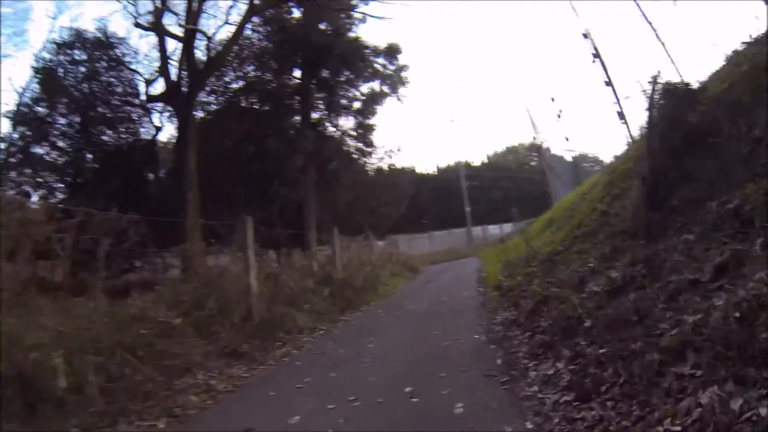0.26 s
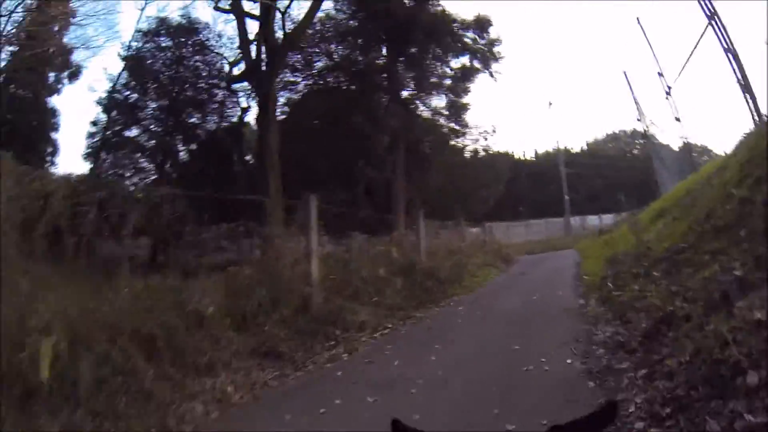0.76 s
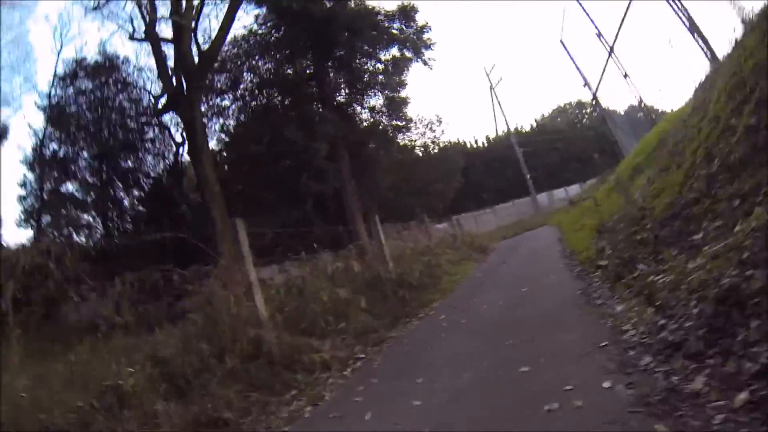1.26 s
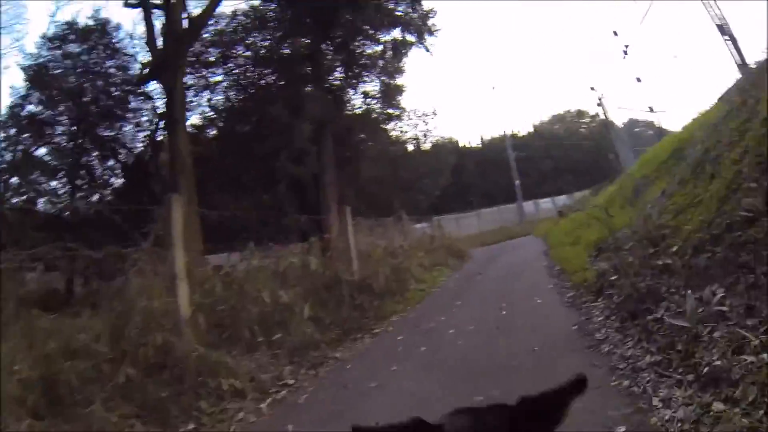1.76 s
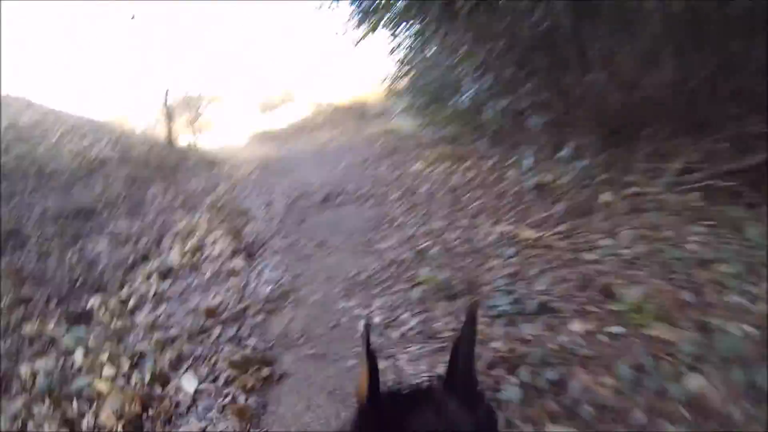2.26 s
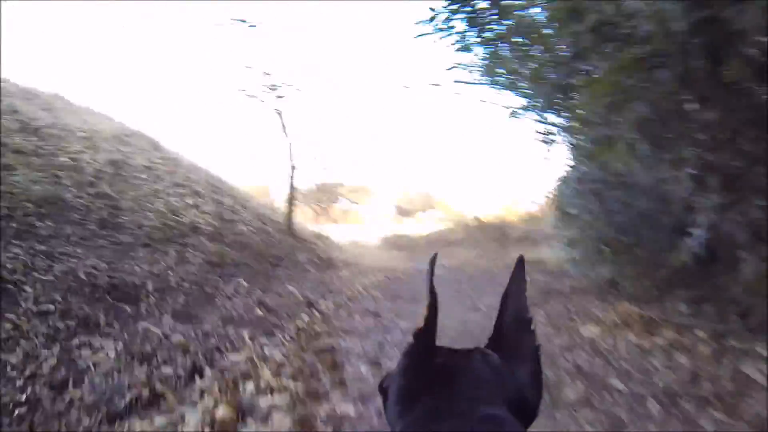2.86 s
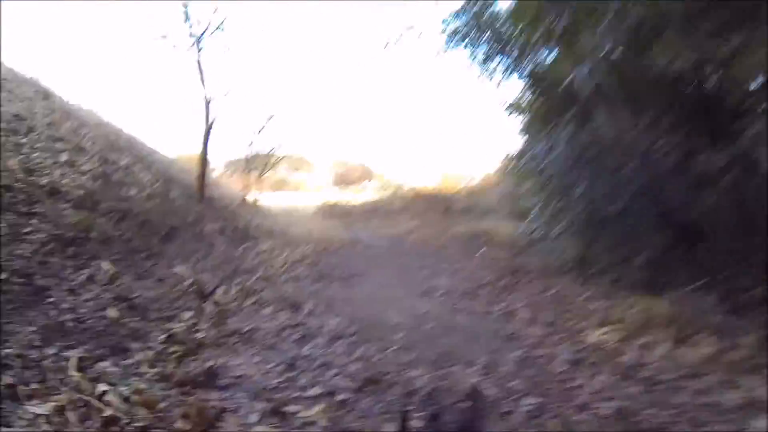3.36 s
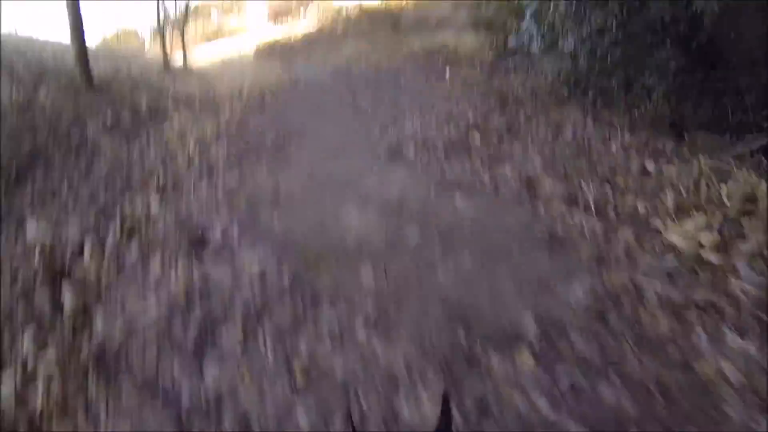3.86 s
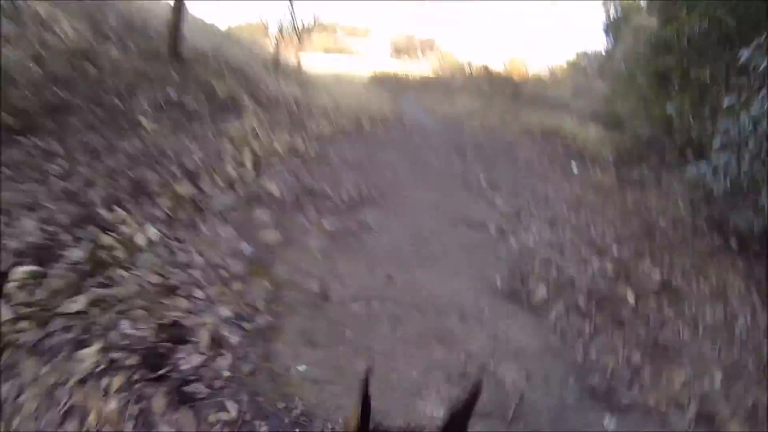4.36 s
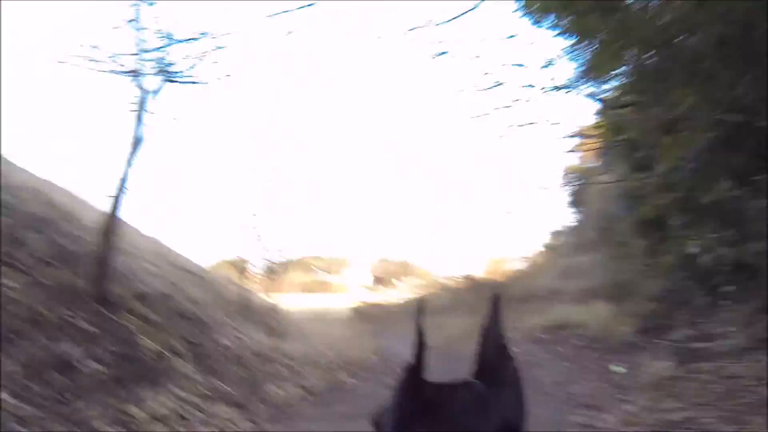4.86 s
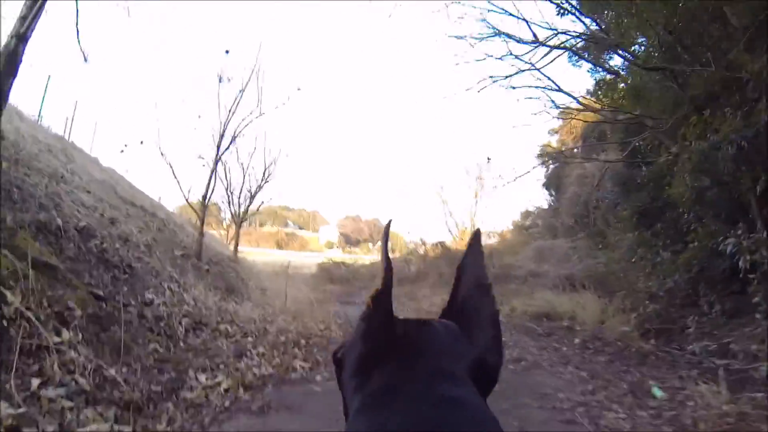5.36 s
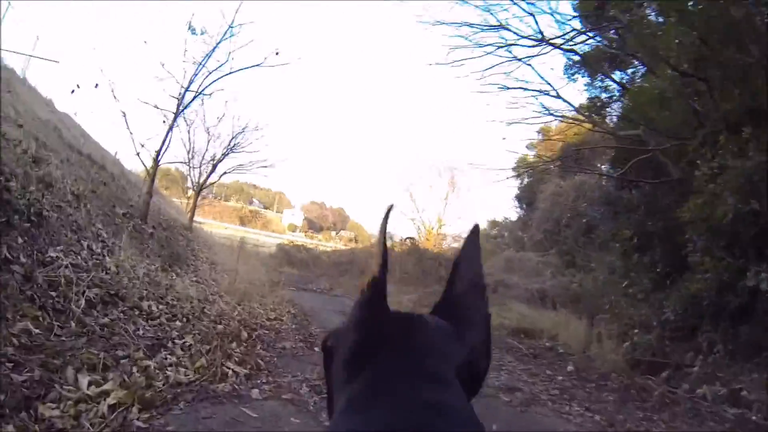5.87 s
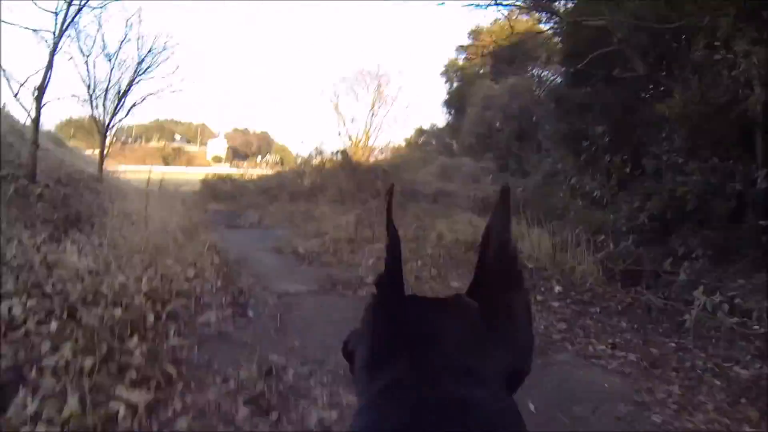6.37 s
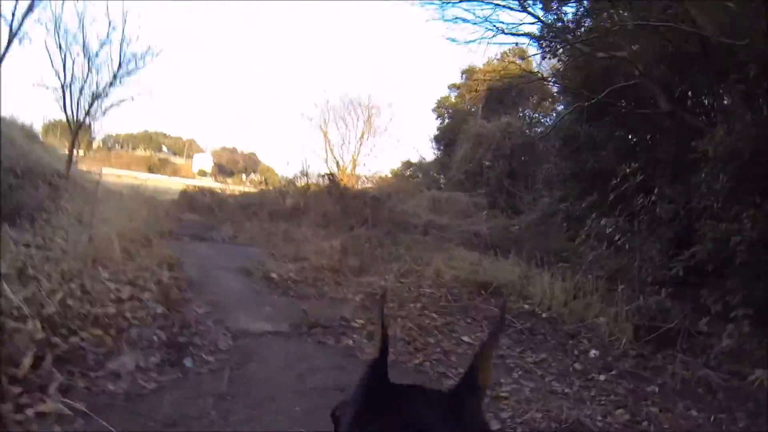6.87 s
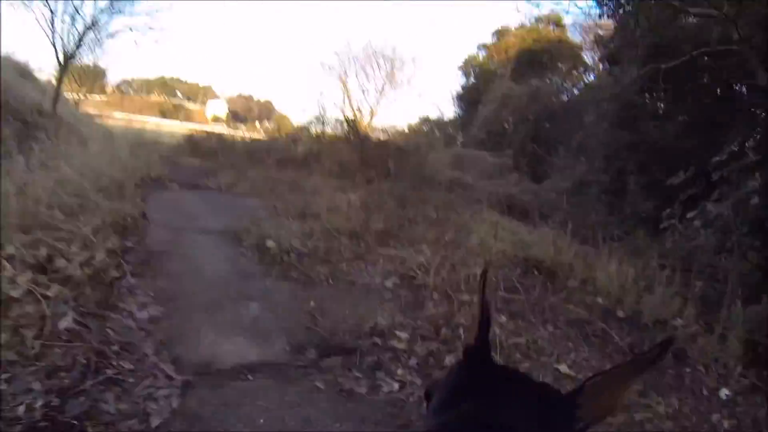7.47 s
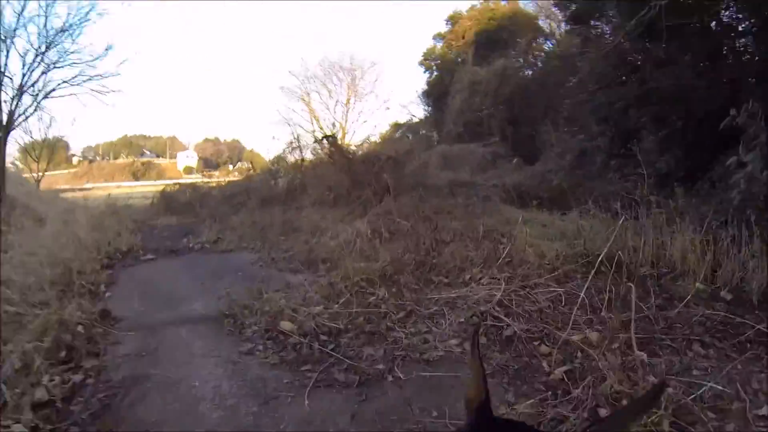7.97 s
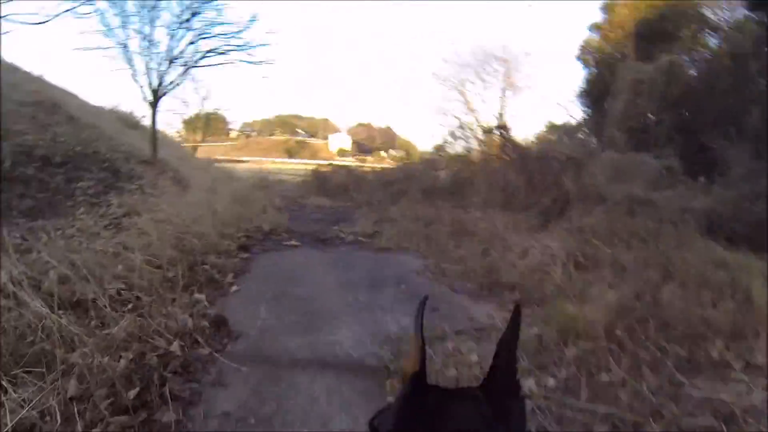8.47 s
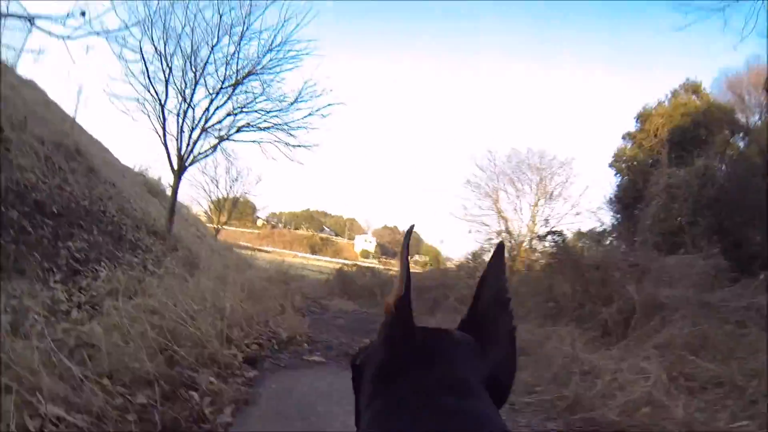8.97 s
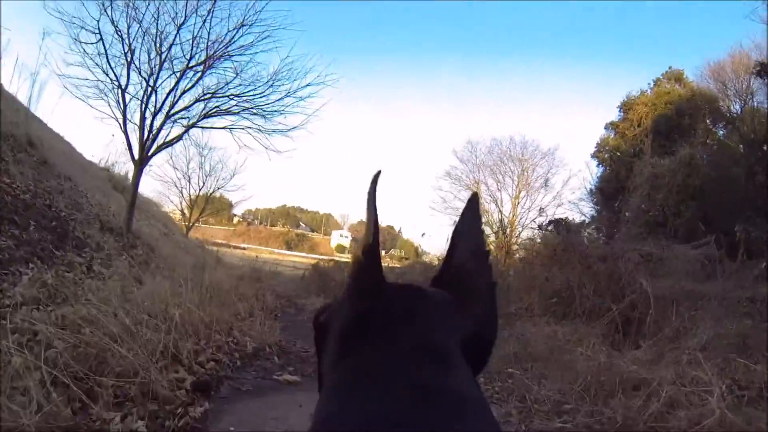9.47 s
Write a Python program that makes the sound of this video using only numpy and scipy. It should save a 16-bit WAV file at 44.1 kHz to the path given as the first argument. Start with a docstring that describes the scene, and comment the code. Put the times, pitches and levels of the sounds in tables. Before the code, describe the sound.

A very close, dry, slightly muffled outdoor sound: low thuds and rumble of a shaken harness, with crisp plastic clicks at first. Small metal tags on a dog's collar soon clink together in uneven clusters, ringing high and briefly, bouncing and jiggling between harder hits. Dry leaves crackle softly beneath the paws, and faint airy noise wavers behind.

```python
"""Outdoors: a dog trots along with a microphone strapped to its back, first on a paved path; at 1.85 s the
scene changes to a leafy one. Jolts throw two metal tags on its collar together: decaying sine modes and noise
ticks clack, ring, bounce and jiggle on, and a split ring clicks. The plastic mount snaps as damped modes, with
dull knocks and scuffs as noise bursts; the harness thumps and rumbles as low noise, and paws scuff leaves made
of random grains."""
import sys
import numpy as np
from scipy import signal
from scipy.fft import rfft, irfft, next_fast_len
from scipy.io import wavfile
from scipy.ndimage import uniform_filter1d

SR = 44100
rng = np.random.default_rng(int(sys.argv[2]) if len(sys.argv) > 2 else 0)


def put_to_file(sound):
    """Save the sound as 16-bit audio at rate SR, in the file named by the first command-line argument."""
    columns = np.atleast_2d(sound).T  # one column per channel
    safe = np.clip(columns, -1, 1)
    whole_steps = np.round(safe * 32767)
    wavfile.write(sys.argv[1], SR, whole_steps.astype(np.int16))


N = 429093
TIME = np.arange(N) / SR

# hard contacts of the tags: [t/s, clack level/dB, fundamental level/dB,
# large tag's overtone level/dB, small tag's overtone level/dB]
TAG_CONTACTS = [(1.8544, -33, -20.5, -33, -28), (1.9663, -42, -26.5, -27, -23.5),
                (1.986, -17, -22, -36, -27), (2.0034, -26, -22.5, -33, -27.5),
                (2.0338, -20, -21.5, -28.5, -47), (2.1523, -14.5, -24, -39, -21),
                (2.2028, -28, -21.5, -30, -52), (2.2898, -33, -34, -40, -31), (2.318, -20, -52, -36, -36),
                (2.528, -7.5, -33, -48, -25), (2.8297, -18.5, -23, -40, -30.5),
                (2.8889, -23, -21, -24.5, -51), (2.9984, -42, -8.5, -25, -56),
                (3.0225, -21.5, -14.5, -34, -30), (3.0577, -28, -32, -31, -55), (3.139, -20, -21, -29, -28),
                (3.1807, -20.5, -36, -42, -28), (3.356, -24, -25, -35, -56), (3.6455, -10, -19, -22, -49),
                (3.7835, -13.5, -12.5, -31, -33), (3.8125, -25.5, -15, -29, -41.5),
                (3.8698, -26, -21.5, -32, -49), (4.0547, -26.5, -26.5, -36.5, -54),
                (4.3137, -15, -39, -32, -28.5), (4.3737, -21, -33, -30, -54),
                (4.4422, -20.5, -18.5, -28, -34), (4.5095, -23, -16.5, -27, -51),
                (4.6177, -17, -23.5, -34, -42), (4.713, -21, -16.5, -26.5, -44),
                (4.8262, -9, -19, -22.5, -24.5), (4.897, -20, -19, -30, -38),
                (4.9323, -36.5, -13.5, -16.5, -18), (4.9596, -18, -10, -24, -16.5),
                (5.085, -30, -13, -22, -37), (5.131, -44, -25, -19, -32), (5.1564, -19.5, -26, -27, -36),
                (5.1865, -37, -15, -50, -47), (5.3529, -26, -34, -30.5, -35),
                (5.3861, -12.5, -20, -25, -44), (5.4044, -38, -7.5, -31, -19),
                (5.4259, -42, -14.5, -23, -25.5), (5.5284, -19.5, -21.5, -21, -40),
                (5.5755, -31, -14, -21, -33), (5.6508, -16.5, -27.5, -55, -37),
                (5.726, -8.5, -17.5, -23, -18.5), (5.8545, -17.5, -42, -42, -22),
                (5.9585, -16.5, -38, -54, -28), (6.0969, -23.5, -30, -48, -31.5),
                (6.1922, -17, -48, -40, -26), (6.3124, -30, -26, -30, -48), (6.3894, -44, -31, -34.5, -32),
                (6.5654, -16, -19, -18.5, -41), (6.6332, -21, -17, -24.5, -48),
                (6.6942, -21.5, -23.5, -38, -22), (6.862, -44.5, -32, -32, -34.5),
                (6.897, -39, -18.5, -35.5, -26), (6.93, -16.5, -20.5, -34, -33),
                (7.0871, -14.5, -28, -30.5, -35), (7.0975, -21.5, -41, -34.5, -41),
                (7.2986, -36, -24, -34.5, -55), (7.4006, -32, -46, -42, -49),
                (7.4372, -19.5, -31, -34, -26.5), (7.4537, -12.5, -42, -43, -34),
                (7.7036, -23.5, -39, -46, -60), (7.7515, -19.5, -34, -37.5, -39.5),
                (7.87, -47, -39, -31, -42), (8.015, -19.5, -22.5, -35.5, -45.5),
                (8.144, -18.5, -40, -34, -45), (8.6488, -25, -25.5, -32.5, -32),
                (8.8138, -18, -25, -35.5, -36), (8.858, -12.5, -41, -50, -33),
                (8.8759, -15.5, -24, -23.5, -38), (8.921, -22.5, -22.5, -36.5, -49),
                (9.007, -19, -27, -23, -38), (9.0181, -10.5, -8.5, -19, -17),
                (9.0405, -13.5, -30, -22, -23), (9.0798, -25, -39, -28, -46),
                (9.158, -25.5, -34, -46, -23.5), (9.2137, -22.5, -38, -42, -30),
                (9.548, -29, -30.5, -27, -22.5), (9.672, -16.5, -25, -50, -33.5)]
# lowest bending mode of each tag: [f/Hz, level/dB, t60/s]
FUNDAMENTAL_MODES = [(1404, -20.5, 0.74), (1487, 0, 0.17)]
# overtones of the large tag: [f/Hz, level/dB, t60/s]
LARGE_TAG_MODES = [(2788, -11.5, 0.12), (4873, -8.5, 0.14), (7534, -5.5, 0.11), (10255, -14, 0.086),
                   (11970, -26.5, 0.16)]
# overtones of the small tag: [f/Hz, level/dB, t60/s]
SMALL_TAG_MODES = [(3043, -14, 0.17), (5544, -7, 0.09), (8180, -5.5, 0.074), (11760, -21.5, 0.049),
                   (13812, -22, 0.12)]
# short-lived modes of the tags pressed together: [f/Hz, level/dB, t60/s]
CLACK_MODES = [(1524, -5.5, 0.11), (1680, -5, 0.082), (1695, -14, 0.052), (1790, -71, 0.021)]
# spectrum of metal edges hitting: [f/Hz, level/dB]
TICK_SPECTRUM = [(500, -17), (1000, -3.5), (2000, -1), (3200, 1.5), (4500, -1), (6500, 2.5), (8000, -4.5),
                 (9500, -7), (12000, -27), (16000, -32)]


def from_db(db):
    """Decibels to gain."""
    return 10 ** (np.asarray(db) / 20)


def rms_one(x):
    """Scale to unit rms."""
    return x / np.sqrt(np.mean(x ** 2) + 1e-20)


def gain_curve(rows):
    """Rows (t/s, level/dB) as a gain for every sample."""
    return from_db(np.interp(TIME, *np.transpose(rows)))


def dying(t, t60):
    """Exponential decay, 60 dB down after t60 seconds."""
    return np.exp(-np.log(1000) * t / max(t60, 1e-4))


def coloured(x, spectrum):
    """Shape x by a spectrum of (f/Hz, level/dB) points; rms 1."""
    hz, db = np.transpose(spectrum)
    size = next_fast_len(N)
    bins_hz = np.maximum(np.arange(size // 2 + 1) * SR / size, 1)
    low_cut = 1 / (1 + (hz[0] / 2 / bins_hz) ** 4)  # rolls off an octave below the first point
    gain = from_db(np.interp(np.log(bins_hz), np.log(hz), db))
    return rms_one(irfft(rfft(x, size) * low_cut * gain, size)[:N])


def noise(spectrum):
    """Gaussian noise of the given colour."""
    return coloured(rng.standard_normal(N), spectrum)


def add(out, s, sound):
    """Mix a sound into out, starting at s seconds."""
    i = max(round(s * SR), 0)
    out[i:i + len(sound)] += sound[:max(N - i, 0)]


def air(level_db, waver_db, per_s):
    """A faint airy noise that swells and sinks at random."""
    # spectrum of the air: [f/Hz, level/dB per Hz]
    air_spectrum = [(100, 2.5), (300, -4), (900, -6), (2000, -26), (2900, -9.5), (4300, -28), (5800, -15.5),
                    (9000, -25), (15000, -33)]
    swells = np.interp(TIME * per_s, np.arange(200), rng.uniform(-1, 1, 200))
    return from_db(level_db + waver_db * swells) * noise(air_spectrum)


def leaves(per_s, grain_db, level_db):
    """Dry leaves and grit crackle in a dense stream of uneven grains, swelling at each scuff."""
    # paws drag through the leaves: [t of peak/s, relative level/dB, t60 of the settling/s]
    scuffs = [(2.01, -57, 1.3), (2.11, -54, .6), (2.24, -54, 0.65), (2.82, -46, 0.48), (3.29, -55, .4),
              (3.67, -54, 3.4), (4.31, -55, 0.64), (4.86, -55, 1.25), (5.36, -45, 0.79), (5.74, -51, 1.2),
              (6.21, -64, 1.1), (6.85, -56, 0.67), (7.07, -58.5, .4), (7.95, -62, 1.3), (8.85, -67, 2.2),
              (9.02, -46.5, 0.64)]
    # spectrum of the crackle: [f/Hz, level/dB per Hz]
    leaf_spectrum = [(300, -1.5), (900, 2.5), (1600, 18.5), (2400, 7.5), (4500, 5.5), (6200, 6.5),
                     (9000, -1.5), (12000, -5), (16000, -18)]
    leafy_from_s, rise_s = 1.85, 0.066
    paved_rel_db, leafy_rel_db = -71.5, -67.5  # steady crunch, before level_db

    pressure = from_db(np.where(TIME < leafy_from_s, paved_rel_db, leafy_rel_db))
    t = TIME[:2 * SR]
    for s, db, t60 in scuffs:
        rise = np.minimum(t / rise_s, 1)
        settling = dying(np.maximum(t - rise_s, 0), t60)
        add(pressure, s - rise_s, from_db(db) * rise * settling)

    sizes = from_db(grain_db * np.minimum(rng.exponential(1, N), 5)) * rng.standard_normal(N)
    grains = sizes * (rng.random(N) < per_s / SR)
    return from_db(level_db) * pressure * coloured(grains, leaf_spectrum)


def shudder(spectrum, even_s):
    """Low shaking, its strength evened out over even_s."""
    x = noise(spectrum)
    power = uniform_filter1d(x ** 2, max(int(even_s * SR), 2))
    return x / np.sqrt(power + 0.0067)


def harness(thump_db, sway_db, swell_s, settle_s):
    """Every jolt makes the housing shudder for a moment, over a slower rumble."""
    # heavy jolts: [t/s, relative level/dB]
    thumps = [(0.034, -35.5), (0.711, -39.5), (0.973, -45), (1.38, -51), (2.206, -37.5), (2.535, -30),
              (3.091, -33), (3.232, -36.5), (3.31, -35), (3.388, -28), (3.558, -35.5), (3.817, -42.5),
              (4.475, -33), (4.977, -29), (5.072, -37), (5.233, -23.5), (6.283, -35.5), (6.442, -34.5),
              (6.916, -32), (7.139, -31), (7.217, -41), (7.593, -25.5), (7.754, -30.5), (7.847, -37.5),
              (8.138, -31), (8.3, -29), (8.892, -38), (9.612, -37)]
    # slow rumble: [t/s, relative level/dB]
    sway = [(0.0, -46), (0.02, -39.5), (0.6, -49), (3.06, -41), (3.09, -33.5), (4.69, -48), (4.99, -37.5),
            (7.45, -44), (7.59, -29), (7.64, -38.5), (9.57, -45), (9.62, -35.5), (9.73, -53)]
    # spectra of jolt and rumble: [f/Hz, level/dB per Hz]
    thump_spectrum = [(45, 5.5), (85, 7.5), (150, 3.5), (210, -6), (330, -16.5), (800, -35.5), (5000, -77)]
    sway_spectrum = [(20, 0), (50, 2), (75, -4.5), (130, -16), (300, -48.5), (3000, -93)]
    steps_per_s, step_rel_db = 7, -48.5  # the trot itself gives soft jolts

    steps = []
    for k in range(int(steps_per_s * N / SR)):
        steps.append(((k + rng.random()) / steps_per_s, step_rel_db))

    force = np.zeros(N)
    for s, db in [*thumps, *steps]:
        near = slice(max(round((s - .2) * SR), 0), round((s + .2) * SR))
        t = TIME[near] - s
        width_s = np.where(t < 0, swell_s, settle_s)
        force[near] += from_db(db + thump_db) * np.exp(-(t / width_s) ** 2)
    jolts = force * shudder(thump_spectrum, even_s=0.0285)
    rumble = from_db(sway_db) * gain_curve(sway) * shudder(sway_spectrum, even_s=0.84)
    return jolts + rumble


def knocks_and_scuffs(t60, level_db):
    """Short noise bursts: knocks, scuffs and a tag contact, each dying away exponentially."""
    # knocks and scuffs: [t/s, relative level/dB]
    bursts = [(2.272, -25.5), (2.529, -21), (2.787, -24), (2.803, -19), (3.293, -27.5), (3.335, -26),
              (3.645, -22), (5.514, -22.5), (5.842, -27.5), (5.909, -22), (6.183, -26), (6.567, -24.5),
              (7.823, -32), (8.819, -25), (8.857, -19.5), (9.288, -28.5), (9.312, -31.5)]
    # spectrum of a burst: [f/Hz, level/dB]
    burst_spectrum = [(150, 0.5), (500, 1.5), (1200, 4.5), (2500, 5), (7000, -10), (15000, -47)]
    force, t = np.zeros(N), TIME[:SR // 10]
    for s, db in bursts:
        add(force, s, from_db(db + level_db) * dying(t, t60))
    return force * noise(burst_spectrum)


def mount_snaps(rebound_s, rebound_db):
    """The plastic joint slips: damped modes give a sharp snap and a faint rebound."""
    # slips: [t/s, level/dB]
    slips = [(0.7353, -12.5), (1.2376, -12.5), (1.4530, -7.5), (1.689, -38.5), (2.625, -28.5),
             (3.4130, -18), (3.7380, -24.5), (5.3256, -17), (6.022, -23.5), (6.4853, -18.5),
             (6.9583, -20.5), (8.2690, -28), (8.375, -36.5)]
    # modes of the mount: [f/Hz, level/dB, t60/s]
    mount_modes = [(2530, -14.5, 0.0071), (3160, 1.5, 0.0055), (4840, 2, 0.0019), (6660, -1, 0.0044)]
    out, t = np.zeros(N), TIME[:SR // 20]
    shape = np.zeros(len(t))
    for k, (hz, db, t60) in enumerate(mount_modes):
        polarity = (-1) ** k
        shape += polarity * from_db(db) * dying(t, t60) * np.sin(2 * np.pi * hz * t)

    for s, db in slips:
        snap = from_db(db) * shape
        add(out, s, snap)
        add(out, s + rebound_s, from_db(rebound_db) * snap)
    return signal.sosfilt(signal.butter(4, [2200, 7600], "band", fs=SR, output="sos"), out)


def ring_clicks(t60, level_db):
    """The tags' split ring hits the collar's fitting, steel on steel: a bright click with no tone."""
    # clicks: [t/s, relative level/dB]
    clicks = [(2.8897, -22.5), (3.6463, -15), (4.3148, -21.5), (4.9125, -20.5), (5.2248, -25.5),
              (5.5279, -20), (5.5538, -22), (6.5649, -16.5), (7.401, -25), (7.602, -27.5), (7.957, -30.5),
              (9.0176, -15.5)]
    force, t = np.zeros(N), TIME[:SR // 20]
    for s, db in clicks:
        add(force, s, from_db(db + level_db) * dying(t, t60))
    return force * noise(TICK_SPECTRUM)


def radiated(x):
    """A small plate gives off almost nothing below its lowest mode."""
    return signal.sosfilt(signal.cheby1(6, .5, 1310, "high", fs=SR, output="sos"), x)


def ring(t, modes, spread_db, detune):
    """One blow on a set of modes; strength and pitch vary with the point of contact."""
    out = np.zeros(len(t))
    for hz, db, t60 in modes:
        strength, pitch = 2 * rng.random(2) - 1
        tone = np.sin(2 * np.pi * hz * (1 + detune * pitch) * t)
        out += from_db(db + spread_db * strength) * dying(t, t60) * tone
    return out


def jiggles(uneven_db):
    """Each run is a string of touches, uneven in time and strength: (t/s, clack/dB, ring/dB)."""
    # runs of light touches: [start/s, length/s, clack level/dB, ring level/dB]
    rattles = [(0.011, 0.074, -32, -54.5), (0.137, 0.071, -32, -56), (.387, .013, -37.5, -53),
               (1.27, .12, -47.5, -79.5), (1.68, .05, -39, -81), (2.29, .1, -35.5, -56),
               (2.451, 0.32, -37, -45.5), (3.49, 0.23, -32, -45), (3.83, 0.18, -33, -41),
               (4.18, 0.11, -35.5, -43), (4.36, 0.46, -31.5, -36.5), (4.87, .37, -25.5, -33.5),
               (5.5, .11, -28.5, -34.5), (5.74, 0.15, -30.5, -29.5), (6.222, 0.22, -36.5, -37.5),
               (6.46, .1, -30.5, -43.5), (6.57, 0.22, -31.5, -33), (6.89, .11, -30, -34.5),
               (7.22, 0.21, -37, -49), (7.87, 0.21, -34, -38.5), (8.325, 0.05, -35, -60),
               (8.438, 0.39, -43, -64), (9.41, 0.31, -41.5, -40)]
    ref_db, ref_per_s, rate_follows = -33, 80.0, .6  # touch rate at ref_db; slower when softer

    touches = []
    for s, length_s, clack_db, ring_db in rattles:
        rate_per_s = ref_per_s * from_db(rate_follows * (clack_db - ref_db))
        count = max(round(length_s * rate_per_s), 1)
        for k, (late, strength) in enumerate(rng.random((64, 2))[:count]):
            db = uneven_db * (2 * strength - 1)
            touch_s = s + length_s * (k + late) / (count + 1)
            touches.append((touch_s, clack_db + db, ring_db + db))
    return touches


def bounces(rebound_s, loss_db, ring_db, count):
    """Tags fall back on each other, each clack softer, the ring alike: (t/s, clack/dB, ring/dB)."""
    touches = []
    for s, clack, low, large, small in TAG_CONTACTS:
        for k in range(1, count + 1):
            s += rebound_s * k * (.5 + rng.random())
            touches.append((s, clack - loss_db * k, max(large, small) + ring_db))
    return touches


def light_touches(touches, clack_db, ring_db, overtone_db, tick_db, soft_s, pressed_t60, count):
    """A free tag ticks and rings, one on the fur clacks softly; each touch mixes both at one of count spots."""
    out, t = np.zeros(N), TIME[:SR // 7]
    cushion = from_db(clack_db) * (1 - dying(t, soft_s)) * dying(t, pressed_t60)
    spots = []
    for grit in noise(TICK_SPECTRUM)[:count * len(t)].reshape(count, -1):
        free = ring(t, FUNDAMENTAL_MODES, spread_db=5.5, detune=.004)
        free += from_db(tick_db) * dying(t, 0.0055) * grit
        overtones = [*LARGE_TAG_MODES, *SMALL_TAG_MODES]
        free += from_db(overtone_db) * ring(t, overtones, spread_db=6.5, detune=0.0043)
        pressed = cushion * ring(t, CLACK_MODES, spread_db=5.0, detune=0.0624)
        spots.append((pressed, from_db(ring_db) * free))

    for (s, clack, ringing), spot in zip(touches, rng.integers(count, size=len(touches))):
        pressed, free = spots[spot]
        add(out, s, from_db(clack) * pressed + from_db(ringing) * free)
    return radiated(out)


def tags(caught_t60, tick_t60, chatter_t60, tick_db, chatter_db):
    """Each contact ticks, clacks and sets both tags' modes ringing until the next one catches them."""
    tones, ticks, grit = np.zeros(N), np.zeros(N), noise(TICK_SPECTRUM)
    gaps_s = np.diff([row[0] for row in TAG_CONTACTS] + [N / SR])
    for (s, clack, low, large, small), gap_s in zip(TAG_CONTACTS, gaps_s):
        t = TIME[:int((np.clip(gap_s, 0, .35) + .08) * SR)]
        tone = from_db(low) * ring(t, FUNDAMENTAL_MODES, spread_db=5.0, detune=0.0045)
        tone += from_db(large) * ring(t, LARGE_TAG_MODES, spread_db=11.0, detune=0.0011)
        tone += from_db(small) * ring(t, SMALL_TAG_MODES, spread_db=9.5, detune=0.0043)
        tone *= dying(np.maximum(t - gap_s, 0), caught_t60)
        pressed = from_db(clack) * ring(t, CLACK_MODES, spread_db=1.0, detune=0.0512)
        add(tones, s, tone + pressed)

        # edges hit, then skid briefly, in step with the force of the blow
        force = np.linalg.norm(from_db([clack, low, large, small]))
        skid = from_db(tick_db) * dying(t, tick_t60) + from_db(chatter_db) * dying(t, chatter_t60)
        start = rng.integers(N // 2)
        add(ticks, s, force * skid * grit[start:start + len(t)])
    return radiated(tones) + ticks


def scene():
    """Path, harness, mount and collar, all close by in open air."""
    path = air(level_db=-57.5, waver_db=6.5, per_s=9.0)
    path += leaves(per_s=16000, grain_db=6.0, level_db=6.5)
    jolts = harness(thump_db=1.0, sway_db=1.5, swell_s=0.033, settle_s=0.024)
    bursts = knocks_and_scuffs(t60=0.046, level_db=-4.0)
    mount = mount_snaps(rebound_s=.0037, rebound_db=-20.5)

    collar = ring_clicks(t60=0.018, level_db=-0.5)
    touches = bounces(rebound_s=0.0087, loss_db=10.0, ring_db=-5.5, count=2)
    touches += jiggles(uneven_db=6.5)
    collar += light_touches(touches, clack_db=4.0, ring_db=-0.5, overtone_db=-4.0, tick_db=-0.5,
                            soft_s=0.0079, pressed_t60=0.081, count=32)
    collar += tags(caught_t60=0.041, tick_t60=0.0081, chatter_t60=0.07,
                   tick_db=-18.0, chatter_db=-23.5)
    return (path + jolts + bursts + mount + collar)[None]


def record(dry):
    """The housing muffles the treble, and the top is cut."""
    muffled = signal.sosfilt(signal.butter(4, 10500, "low", fs=SR, output="sos"), dry)
    stop_hz = 16800  # 70 dB down from here up
    return signal.sosfilt(signal.cheby2(14, 70, stop_hz, fs=SR, output="sos"), muffled)


dry = scene()
out = record(dry)
put_to_file(out)
```